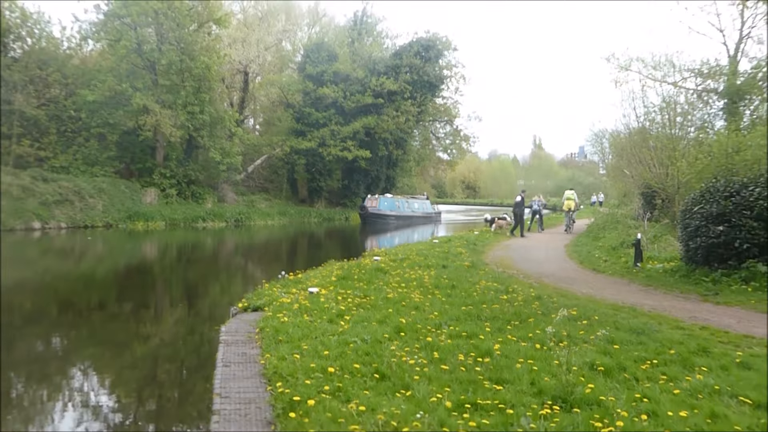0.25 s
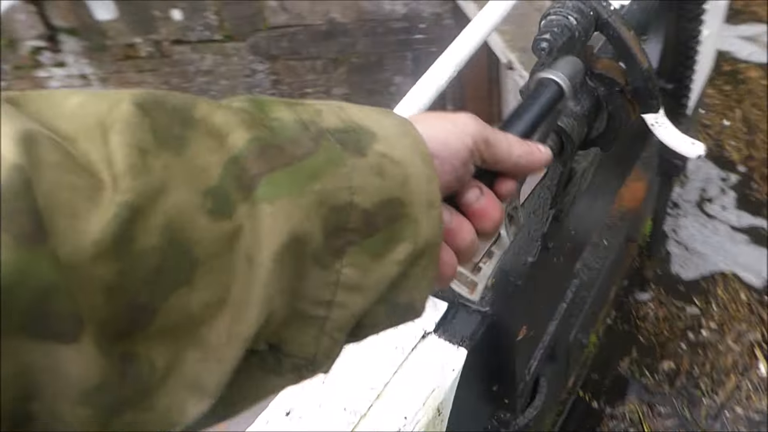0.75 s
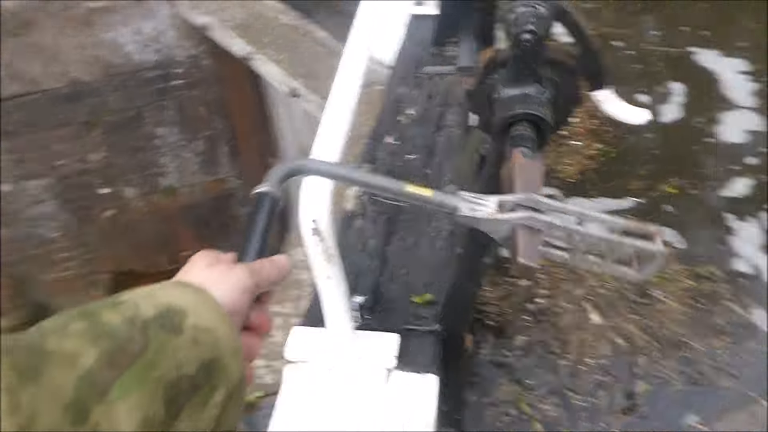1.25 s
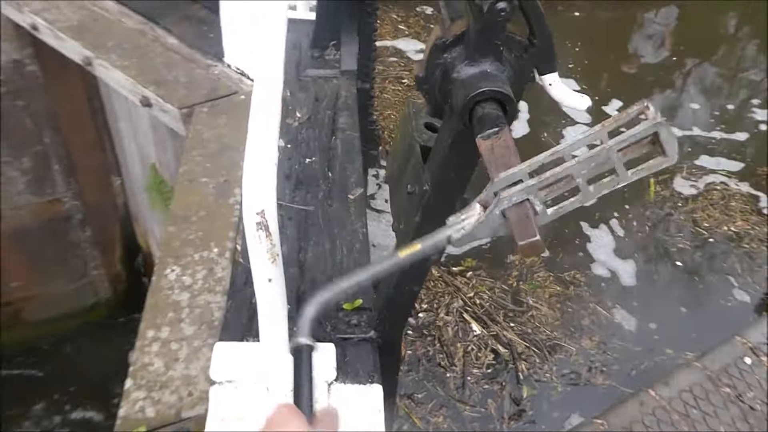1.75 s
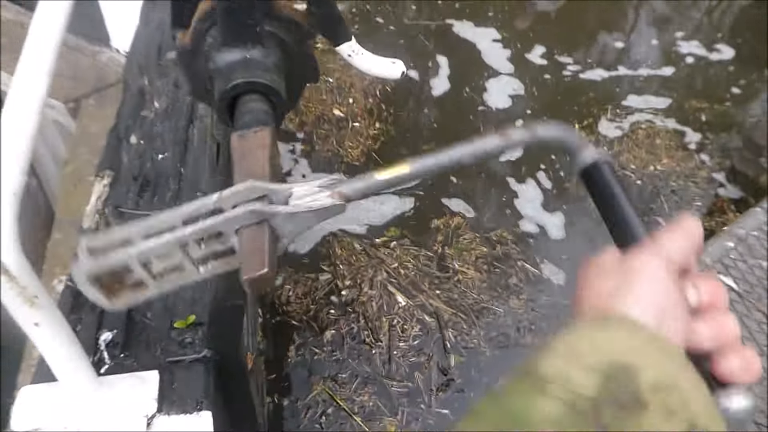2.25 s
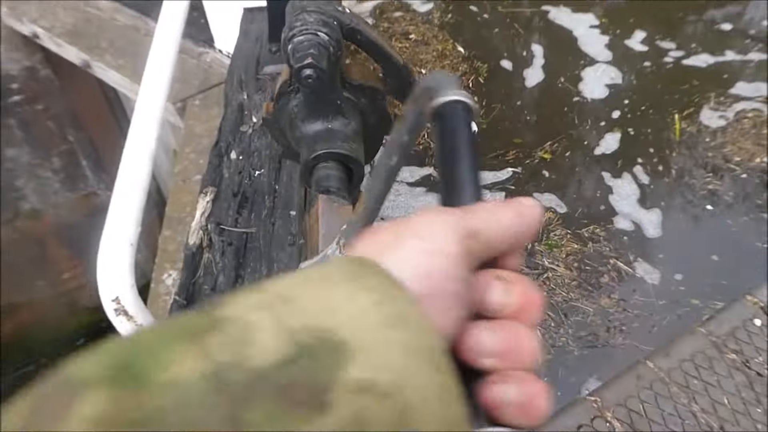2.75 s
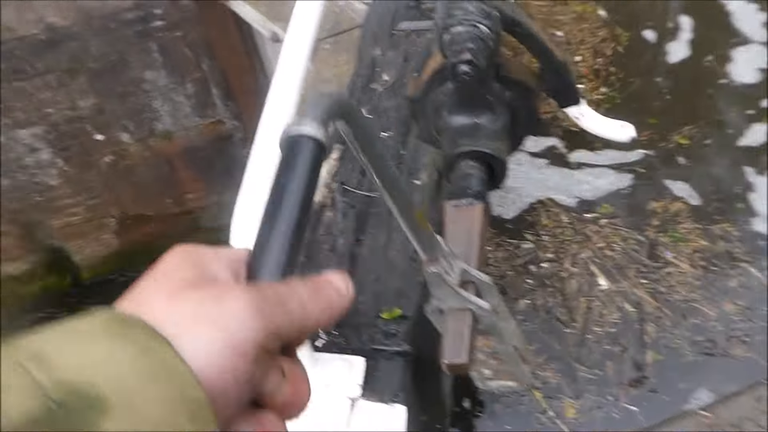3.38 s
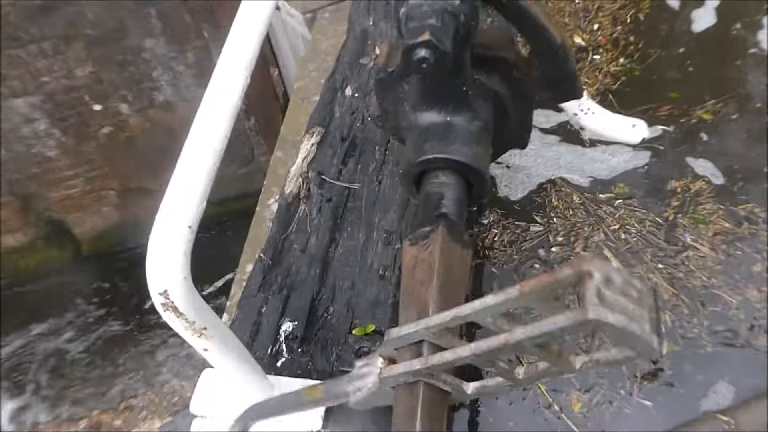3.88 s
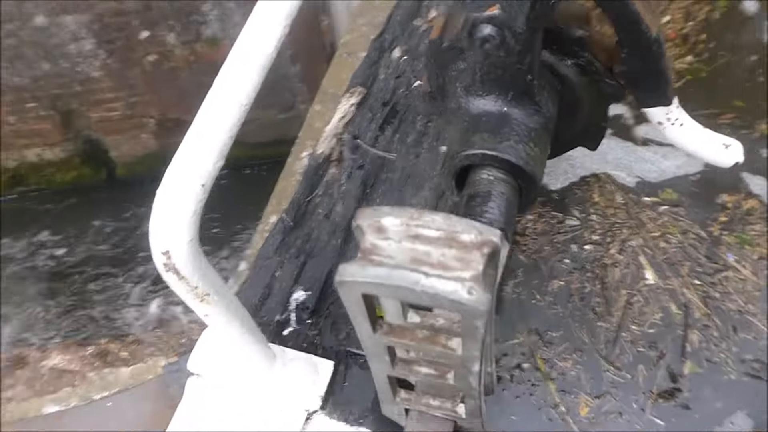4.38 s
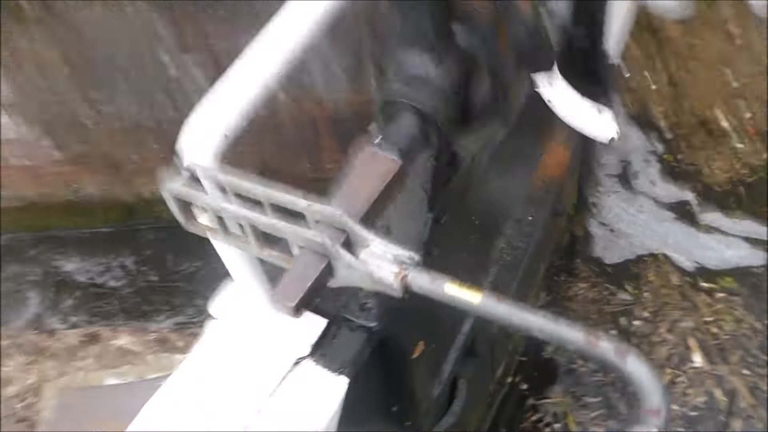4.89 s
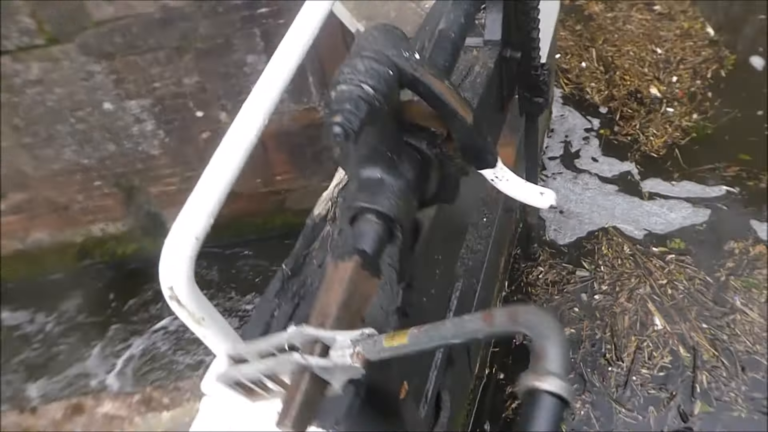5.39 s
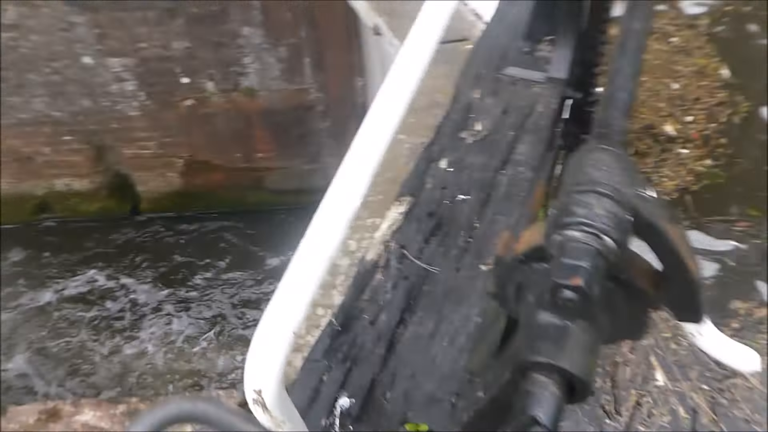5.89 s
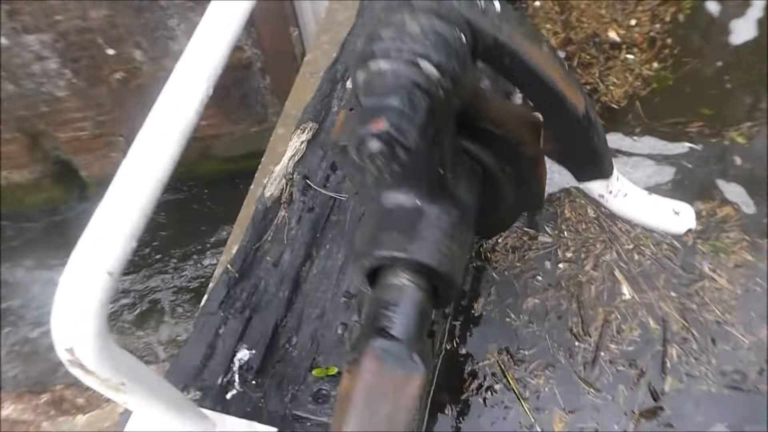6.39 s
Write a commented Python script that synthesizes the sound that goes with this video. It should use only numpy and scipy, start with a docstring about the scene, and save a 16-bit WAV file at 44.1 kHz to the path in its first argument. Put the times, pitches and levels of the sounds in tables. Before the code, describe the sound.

Quiet open air cuts abruptly to a close iron pawl clacking unevenly over ratchet teeth, with timber knocks and low gurgling water behind.

```python
"""Quiet open air on a towpath, two soft bumps on the camera, then all at once a canal lock, close by.
A windlass winds up the paddle gear: the iron pawl drops unevenly from tooth to tooth, ringing as decaying
modes, chattering and rebounding; the cogs clunk and the timber gate knocks, both shaped noise.
From there on water gurgles and fizzes past the gate as patchy noise all round the two microphone ports,
the spindle rubs once, a short echo answers, and the hand that holds the camera bumps it now and then."""
import sys
import numpy as np
from scipy import signal
from scipy.fft import rfft, irfft, next_fast_len
from scipy.io import wavfile
from scipy.ndimage import uniform_filter1d, map_coordinates

SR = 44100
rng = np.random.default_rng(int(sys.argv[2]) if len(sys.argv) > 2 else 0)


def transcribe(signal):
    """Save signal, clipped to [-1, 1], as a 16-bit WAV file at the path in sys.argv[1]."""
    frames = np.atleast_2d(signal).T
    limited = np.clip(frames, -1, 1)
    pcm = np.round(limited * 32767).astype(np.int16)
    wavfile.write(sys.argv[1], SR, pcm)


N = 292824

# pawl drops: t/s, strength/dB against a usual drop, landing spot across the tooth (-1 to 1),
# contact hardness as treble gain/dB
PAWL_DROPS = [(0.8852, -4, 0.32, 9.5), (1.2027, 0, -0.15, 6), (1.4014, -3.5, 1, 1.5),
              (1.8143, -5.5, -0.63, 4.5), (2.081, -2, .5, 4), (2.2342, 0, 0.68, 0.5),
              (2.356, 2.5, -0.4, -5), (2.477, 2.5, -0.49, 0.5), (2.9107, -2.5, 0.7, -1.5),
              (3.671, 1, -0.014, 0), (3.825, 1.5, 0.23, -3.5), (3.9959, 1, -0.091, -3),
              (4.2127, -2, .45, 2), (4.862, 5, -0.45, -0.5), (5.0, -0.5, -0.82, 1),
              (5.4987, 2.5, -0.42, -11.5), (5.6653, 3, -0.84, -6), (6.0232, -6.5, 0.054, 7.5),
              (6.2053, 0.5, -0.13, 3.5), (6.3899, -0.5, -0.24, 3.5), (6.5664, 2.5, 0.21, -2.5)]
# louder rebounds of the pawl: t/s, relative level/dB
PAWL_REBOUNDS = [(2.115, -36), (2.277, -29.5), (2.39, -21), (3.7132, -27), (4.251, -25.5), (4.29, -30),
                 (5.05, -34), (5.525, -29), (5.613, -37.5), (6.409, -25), (6.615, -31), (6.6344, -26)]
# the cogs take up their slack loudly: t/s, relative level/dB
COG_CLUNKS = [(0.763, -27.5), (2.325, -32), (2.599, -35.5), (3.924, -35.5), (3.975, -33), (4.262, -28.5),
              (4.807, -37), (4.974, -35.5), (5.578, -32.5), (5.974, -28.5), (6.007, -28), (6.056, -30),
              (6.307, -34.5)]
# soft bumps on the camera body: t/s, relative level/dB, f/Hz
CAMERA_BUMPS = [(0.234, -48, 115), (0.351, -45.5, 121), (0.943, -38, 134), (1.06, -37.5, 150),
                (1.301, -19.5, 242), (1.313, -30, 154), (2.39, -32.5, 295), (2.6, -25, 404),
                (2.648, -45, 150), (4.971, -37, 195)]
# modes of the iron pawl: f/Hz, relative level/dB, t60/s, gain/dB when it lands at spot +1
PAWL_MODES = [(1319, -10.5, 0.13, 10.5), (1770, -13, 0.33, 10), (2893, -9, 0.13, 0.5), (3812, -6, 0.14, 9),
              (5515, -10.5, 0.16, 0), (5568, -4, 0.094, -6.5), (5620, -10, 0.06, 5), (6840, -26, 0.065, 11),
              (7420, -14, 0.11, 10), (8210, -24.5, 0.069, 4), (9050, -16.5, 0.13, 2.5),
              (9770, -13, 0.11, -2.5), (9780, -14.5, 0.11, -5.5), (10230, -17.5, 0.087, -1),
              (12460, -25.5, 0.074, 9), (14040, -30, 0.11, 1), (13800, -31, 0.15, 4)]
MODE_HZ, MODE_DB, MODE_T60_S, MODE_SPOT_DB = np.transpose(PAWL_MODES)
# spectrum of iron snapping on iron: f/Hz, relative level/dB
CRACK_SPECTRUM = [(300, -45), (1200, 4), (2000, 5.5), (3300, 6.5), (4500, -2), (5700, 4), (8000, -5),
                  (10000, -17.5), (12000, -3.5), (16000, -31)]
# spectrum of the knocking timber gate: f/Hz, relative level/dB
GATE_SPECTRUM = [(50, -50), (150, -19.5), (310, 2.5), (420, 1.5), (560, -7), (870, 4), (1100, 0.5),
                 (1550, -7.5), (3200, -13.5), (6000, -21), (15000, -47)]
# spectrum of greased cogs meeting: f/Hz, relative level/dB
COG_SPECTRUM = [(60, -47), (200, 1), (340, 10.5), (550, -0.5), (870, 10.5), (1500, -1), (2300, -4),
                (3400, -9.5), (5000, -17), (7500, -25), (15000, -39)]
# spectrum of the spindle rubbing in its bearing: f/Hz, relative level/dB
RUB_SPECTRUM = [(1500, -35), (2000, 1), (2150, -1), (2380, 0), (2700, -19), (4000, -28), (4700, -16),
                (5600, -26), (8000, -44)]
# spectrum of the spilling water: f/Hz, relative level/dB
WATER_SPECTRUM = [(30, -68), (85, -17), (130, -14), (200, 1), (270, 3.5), (400, 1.5), (620, -4.5), (900, 0),
                  (1400, -8.5), (2500, -16.5), (5000, -19), (8000, -23.5), (10000, -19), (15000, -30)]
# spectrum of the distant open air: f/Hz, relative level/dB
AIR_SPECTRUM = [(30, -29), (120, -8.5), (260, -4.5), (550, -5), (800, 0), (1400, -9.5), (3000, -19),
                (6000, -26.5), (9000, -29.5), (12500, -30), (13250, -18), (13900, -37), (16000, -47)]
# swell of the spilling water, used about its mean: t/s, level/dB
WATER_SWELL = [(0.75, -52), (0.88, -52.5), (1.77, -49.5), (2.33, -50), (2.67, -53), (3.93, -50.5),
               (4.3, -53.5), (4.79, -52), (4.99, -51), (5.39, -53), (6.49, -52.5), (6.6, -56)]
# decay of the echo: f/Hz, t60/s
ECHO_DECAY = [(200, 0.41), (1500, 0.076), (5000, 0.1), (14000, 0.057)]
# right microphone port against left: f/Hz, gain/dB
RIGHT_PORT_GAIN = [(60, -9), (120, -12), (210, -16), (400, -20), (700, -8), (1300, -2.5), (2400, 0.2),
                   (8000, -1), (10000, -2.5), (15000, -5)]
# right microphone port against left: f/Hz, phase/rad
RIGHT_PORT_PHASE = [(300, 0), (400, 3.5), (520, 2), (900, 3), (2000, 2.5), (3300, 2), (6000, 1.4),
                    (10000, 1.5), (15000, 0.95)]
# likeness of the two ports in diffuse sound: f/Hz, likeness (0-1)
PORT_LIKENESS = [(60, .5), (220, 0.65), (430, 0.43), (800, 0.92), (1500, 0.79), (4000, 0.73), (9000, 0.58),
                 (15000, .4)]

LOCK_S = 0.641  # the water at the lock replaces the towpath air from here on
TOP_HZ = 15700  # band limit of the microphone
FALL_DB = -31  # ring of a usual drop: every tooth lets the pawl fall from the same height
# a drop stronger than this seats at once: dB less chatter and knock per dB above it
SEAT_ABOVE_DB, SEAT_SLOPE = 2, 3.2
BOUNCE_S, BOUNCE_DB = 0.036, -40.5  # the usual faint rebound: typical flight, relative level
LEAD_S, LEAD_DB = 0.033, -45  # the cogs touch faintly before each drop: typical lead, relative level
MID_HZ = 3812  # reference for tilts and drift across the modes
HARD_HZ, HARD_OCTAVES = 10500, 0.42  # contact hardness acts most around here: centre, width
# low modes come forward as the winding goes on: below, rate, time at their usual level
LOW_HZ, LOW_RISE_DB_PER_S, LOW_EVEN_S = 3300, 1.5, 3.7
RUB_S, RUB_LENGTH_S, RUB_DB = 5.05, 0.25, -52  # the spindle rubs once: start, length, level


def pawl(ring_db, crack_db, crack_grows, crack_hardens, flash_db, flash_grows,
         chatter_db, chatter_s, hop_tilt_db):
    """Teeth catch the pawl at varied spots, favouring other modes; strong drops flash more, chatter less."""
    out, t = np.zeros(N), np.arange(SR // 3) / SR
    octaves = np.log2(MODE_HZ / MID_HZ)
    for s, db, spot, hard_db in PAWL_DROPS:
        mode_db = FALL_DB + db + colour(s, spot, hard_db)
        snap_db = crack_db + crack_grows * db + crack_hardens * hard_db
        drop_flash_db = flash_db + flash_grows * db
        add(out, s, ring(t, mode_db + ring_db, scatter_db=1.25, flash_db=drop_flash_db, flash_s=0.0055))
        add(out, s, amp(snap_db) * crack(t, t60=0.012, rattle_db=-13, rattle_t60=0.075))
        # quick, weakening hops: light contacts, so they favour the high modes
        for k in range(3):
            hop = ring(t, mode_db + hop_tilt_db * octaves, scatter_db=5, flash_db=11.5, flash_s=0.0038)
            tick = amp(snap_db + 2.0) * crack(t, t60=0.0081, rattle_db=-27, rattle_t60=0.05)
            hop_s = s + chatter_s * (k + rng.uniform(0.6, 1.4))
            hop_db = chatter_db + seating_db(db) - 4.5 * k
            add(out, hop_s, amp(hop_db) * (hop + tick))
    return out


def rebounds(ring_db, crack_db):
    """The pawl touches down again on the same tooth, so with the same colour."""
    out, t = np.zeros(N), np.arange(SR // 3) / SR
    drop_s = np.transpose(PAWL_DROPS)[0]
    faint = [(s + BOUNCE_S * rng.uniform(0.64, 1.5), BOUNCE_DB) for s in drop_s]
    for s, db in PAWL_REBOUNDS + faint:
        _, _, spot, hard_db = PAWL_DROPS[np.searchsorted(drop_s, s) - 1]  # the latest drop before it
        mode_db = colour(s, spot, hard_db) + ring_db
        touch = ring(t, mode_db, scatter_db=3.0, flash_db=10.0, flash_s=0.0089)
        snap = amp(crack_db) * crack(t, t60=0.0055, rattle_db=-6, rattle_t60=0.067)
        add(out, s, amp(db) * (touch + snap))
    return out


def ring(t, mode_db, scatter_db, flash_db, flash_s):
    """The pawl's modes after one contact; they lose a first flash of energy into the tooth."""
    hz, t60 = MODE_HZ[:, None], MODE_T60_S[:, None]
    size, detune, phase = rng.standard_normal((3, len(MODE_HZ), 1))
    # the seat shifts as it rings, so each phase wanders
    wander = np.cumsum(rng.standard_normal((len(MODE_HZ), len(t))), axis=1) / np.sqrt(SR)
    drift = 1.04 * wander * np.sqrt(hz / MID_HZ)
    waves = np.sin(2 * np.pi * (hz * (1 + 0.001 * detune) * t + phase + drift))
    flash = flash_db * np.exp(-t / flash_s)
    level_db = (MODE_DB + mode_db)[:, None] + scatter_db * size + flash - 60 * t / t60
    onset = 1 - np.exp(-t / 0.00026)
    return np.sum(waves * amp(level_db), axis=0) * onset


def crack(t, t60, rattle_db, rattle_t60):
    """The snap of iron on iron and the short rattle behind it."""
    decay = amp(-60 * t / t60) + amp(rattle_db - 60 * t / rattle_t60)
    return noise(CRACK_SPECTRUM, size=len(t)) * decay


def colour(s, spot, hard_db):
    """dB per mode: the landing spot favours some, a hard contact the high ones; the low ones slowly grow."""
    low_db = LOW_RISE_DB_PER_S * (s - LOW_EVEN_S) * (MODE_HZ < LOW_HZ)
    hardness = np.exp(-(np.log2(MODE_HZ / HARD_HZ) / HARD_OCTAVES) ** 2)
    return spot * MODE_SPOT_DB + hard_db * hardness + low_db


def seating_db(db):
    """Gain on chatter and knock: a strong drop seats at once and gives less of both."""
    return -SEAT_SLOPE * max(db - SEAT_ABOVE_DB, 0)


def gate(knock_db, grows_db_per_s, rise_s, t60):
    """Each drop shakes the frame and the timber beam, whose dense modes swell and die."""
    out, t = np.zeros(N), np.arange(SR // 3) / SR
    for s, db, *_ in PAWL_DROPS:
        level_db = knock_db + seating_db(db) + grows_db_per_s * (s - LOW_EVEN_S)
        envelope = amp(level_db - 60 * t / t60) * (1 - np.exp(-t / rise_s))
        add(out, s, envelope * noise(GATE_SPECTRUM, size=len(t)))
    return out


def cogs(clunk_db, rise_s, t60, iron_db):
    """Greased teeth meet with a dull, short clunk that faintly stirs the pawl."""
    out, t = np.zeros(N), np.arange(SR // 4) / SR
    dull_db = -9 * np.log2(MODE_HZ / MID_HZ)
    faint = [(s - LEAD_S * rng.uniform(0.7, 1.3), LEAD_DB) for s, *_ in PAWL_DROPS]
    for s, db in COG_CLUNKS + faint:
        envelope = amp(clunk_db - 60 * t / t60) * (1 - np.exp(-t / rise_s))
        clunk = envelope * noise(COG_SPECTRUM, size=len(t))
        stirred = ring(t, dull_db + iron_db, scatter_db=4.5, flash_db=18.5, flash_s=0.0034)
        add(out, s, amp(db) * (clunk + stirred))
    return out


def spindle(rough_db):
    """A soft, uneven rubbing squeak of the spindle in its bearing swells and fades."""
    u = np.clip((np.arange(N) / SR - RUB_S) / RUB_LENGTH_S, 0, 1)
    swell = 2 * np.sqrt(u * (1 - u))
    return amp(RUB_DB + rough_db * wobble(80)) * swell * noise(RUB_SPECTRUM, size=N)


def bumps(cycles, scuff_db):
    """The hand nudges the camera: a short low push, strongest after the given cycles, with a scuff."""
    out, t = np.zeros(N), np.arange(SR // 8) / SR
    scuff_spectrum = [(40, -37), (150, -23.0), (420, 12), (800, -17), (4000, -52)]  # f/Hz, level/dB
    for s, db, hz in CAMERA_BUMPS:
        u = t * hz / cycles
        push = np.sin(2 * np.pi * hz * t)
        scuff = amp(scuff_db) * noise(scuff_spectrum, size=len(t))
        add(out, s, amp(db) * u * np.exp(1 - u) * (push + scuff))
    return filtered(out, lambda hz: hz ** 3 / (hz ** 3 + 85 ** 3))  # the small case passes no deep bass


def walls(x):
    """Beam, brickwork and water scatter the clicks; the echo changes as the camera moves."""
    out, t = np.zeros((2, N)), np.arange(N) / SR
    places = np.linspace(0, N / SR, num=8)
    for place in places:
        hz, age, z = signal.stft(rng.standard_normal((2, SR // 4)), SR, nperseg=256)
        decay = amp(-60 * age / along(ECHO_DECAY, hz)[:, None])
        tail = signal.istft(z * decay, SR, nperseg=256)[1]
        tail = tail / np.linalg.norm(tail[0])
        share = np.sqrt(np.clip(1 - abs(t - place) / places[1], 0, 1))  # fades from place to place
        late = np.pad(x * share, (SR // 250, 0))  # 4 ms behind the direct sound
        out += signal.fftconvolve(late[None], tail, axes=1)[:, :N]
    return diffuse(out)


def water(gurgle_db, fizz_db, fizz_follows, split_hz):
    """Water gurgles past the gate, low and unsteady; its high fizz follows the swell more evenly."""
    s, db = np.transpose(WATER_SWELL)
    swell_db = np.interp(np.arange(N) / SR, s, db) - db.mean()
    spill = rush(WATER_SPECTRUM, patchy_db=0.9)
    low = filtered(spill, lambda hz: 1 / (1 + (hz / split_hz) ** 4))
    gurgle = unit(low) * amp(gurgle_db + swell_db + 1.47 * wobble(25))
    fizz = unit(spill - low) * amp(fizz_db + fizz_follows * swell_db + 0.22 * wobble(17))
    return gurgle + fizz


def towpath(air_db):
    """Distant open air on the towpath: faint diffuse noise, slightly patchy."""
    return amp(air_db) * rush(AIR_SPECTRUM, patchy_db=0.5)


def rush(spectrum, patchy_db):
    """Diffuse noise of rms 1, its gain varying in random patches of time and frequency."""
    pair = np.array([noise(spectrum, size=N), noise(spectrum, size=N)])
    z = signal.stft(pair, nperseg=512)[2]
    field = uniform_filter1d(rng.standard_normal(z.shape[1:]), size=4, axis=0)
    field = uniform_filter1d(field, size=8, axis=1)
    patchy = signal.istft(z * amp(patchy_db * unit(field)), nperseg=512)[1][:, :N]
    return unit(diffuse(patchy))


def diffuse(pair):
    """Two unrelated signals made as alike as the two ports hear sound from all sides."""
    turn = lambda hz: np.arccos(np.clip(along(PORT_LIKENESS, hz), 0, 1)) / 2
    mid, side = filtered(pair, lambda hz: np.array([np.cos(turn(hz)), np.sin(turn(hz))]))
    return np.array([mid + side, mid - side])


def noise(spectrum, size):
    """Coloured noise of rms 1."""
    return unit(filtered(rng.standard_normal(size), lambda hz: amp(along(spectrum, hz))))


def wobble(rate):
    """A smooth random curve, rate knots a second."""
    return map_coordinates(rng.standard_normal(int(N * rate / SR) + 4), [np.arange(N) * rate / SR])


def filtered(x, response):
    """x times a complex response of frequency."""
    n = x.shape[-1]
    m = next_fast_len(n + 8192)
    return irfft(rfft(x, m) * response(np.fft.rfftfreq(m, 1 / SR)), m)[..., :n]


def along(points, hz):
    """(f/Hz, value) points read on a log frequency axis."""
    f, v = np.transpose(points)
    return np.interp(np.log(hz + 1), np.log(f + 1), v)


def add(track, s, sound):
    """Lay a sound into a track at time s."""
    room = track[max(round(s * SR), 0):][:len(sound)]
    room += sound[:len(room)]


def unit(x):
    """Scaled to rms 1."""
    return x / np.sqrt(np.mean(x ** 2) + 1e-20)


def amp(db):
    """Decibels to gain."""
    return 10 ** (np.asarray(db) / 20)


def scene():
    """The gear close by and its echo, bumps on the camera, and towpath air giving way to water all round."""
    gear = pawl(ring_db=2.5, crack_db=-25.5, crack_grows=0.57, crack_hardens=0.25, flash_db=8.0,
                flash_grows=0.42, chatter_db=-7.5, chatter_s=0.0043, hop_tilt_db=6)
    gear = gear + rebounds(ring_db=-15.5, crack_db=-9.5)
    gear = gear + spindle(rough_db=5)
    gear = gear + gate(knock_db=-29, grows_db_per_s=0.06, rise_s=0.003, t60=0.19)
    gear = gear + cogs(clunk_db=1, rise_s=0.0014, t60=0.1, iron_db=-24)
    echo = amp(-12.0) * walls(gear)
    spill = water(gurgle_db=-48.5, fizz_db=-52.0, fizz_follows=0.77, split_hz=1255)
    background = np.where(np.arange(N) / SR < LOCK_S, towpath(air_db=-56.5), spill)
    return gear + echo + bumps(cycles=0.53, scuff_db=-6) + background


def record(dry):
    """The right microphone port is weak in the bass and turned in phase; a steep band limit cuts the top."""
    port = lambda hz: amp(along(RIGHT_PORT_GAIN, hz)) * np.exp(1j * along(RIGHT_PORT_PHASE, hz))
    right = filtered(dry[1], port)
    return filtered(np.array([dry[0], right]), lambda hz: 1 / np.sqrt(1 + (hz / TOP_HZ) ** 120))


dry = scene()
out = record(dry)
transcribe(out)
```